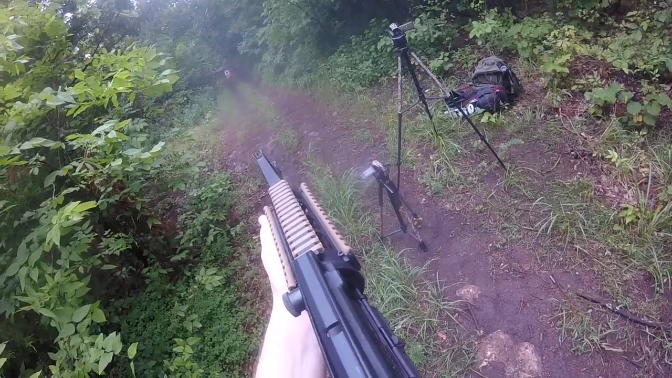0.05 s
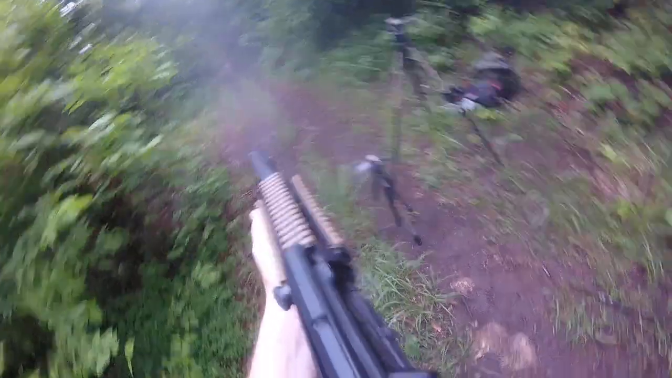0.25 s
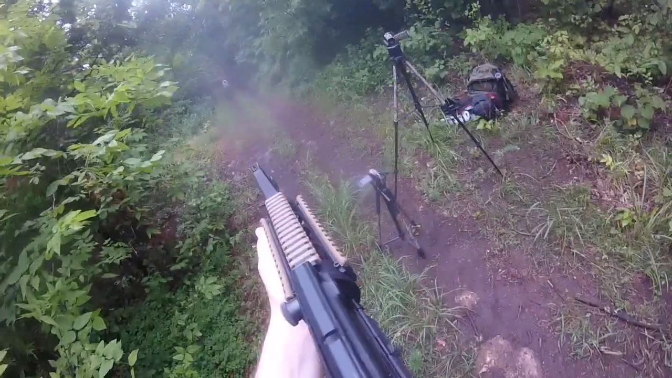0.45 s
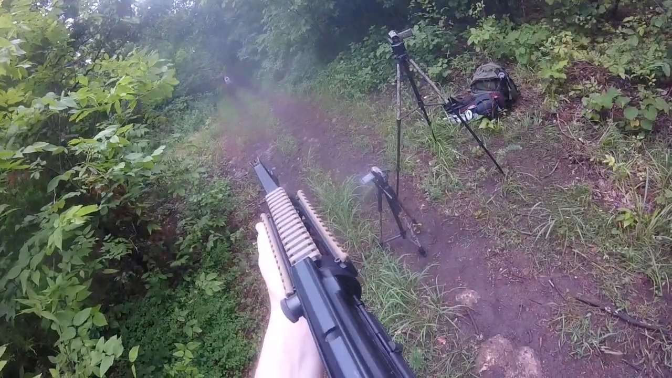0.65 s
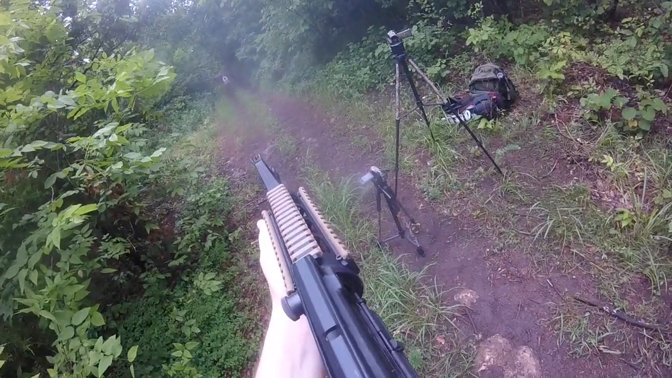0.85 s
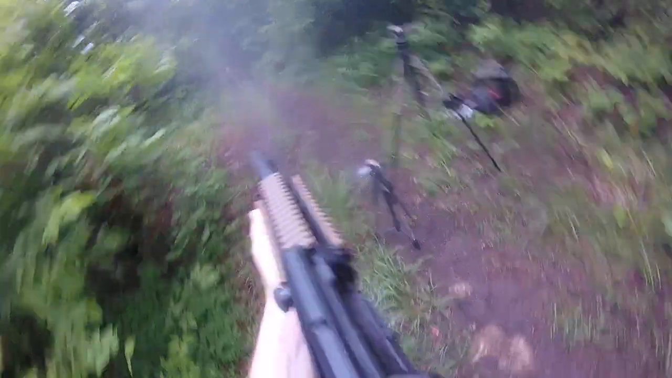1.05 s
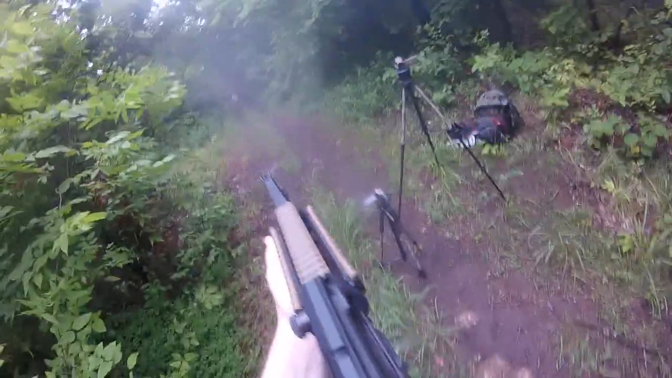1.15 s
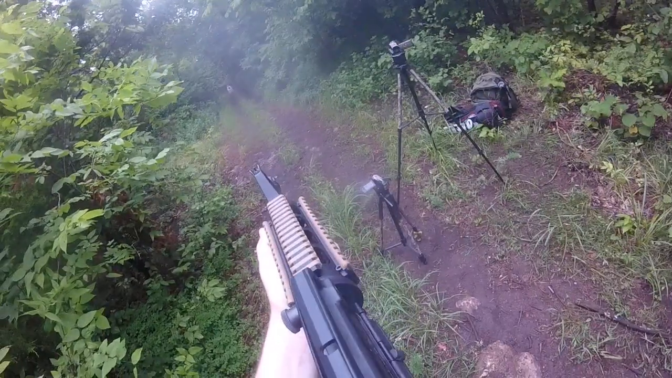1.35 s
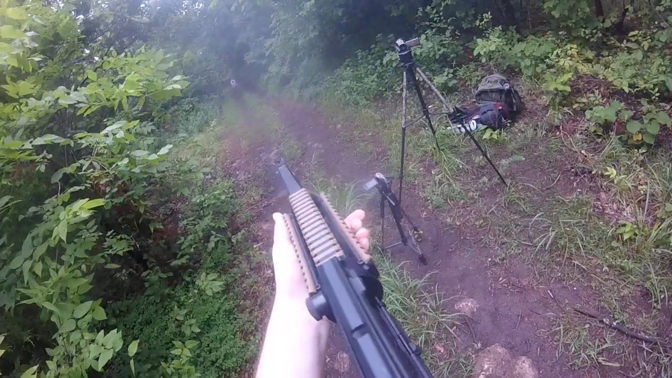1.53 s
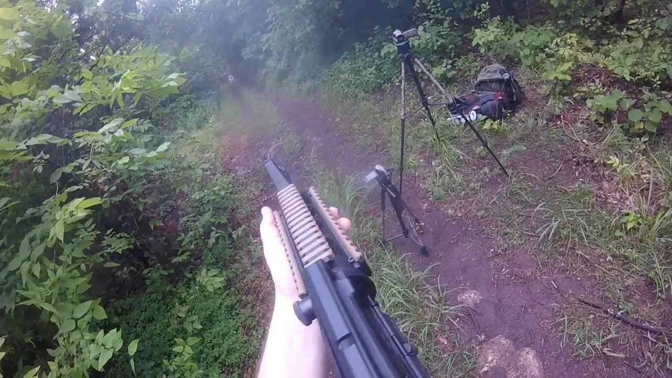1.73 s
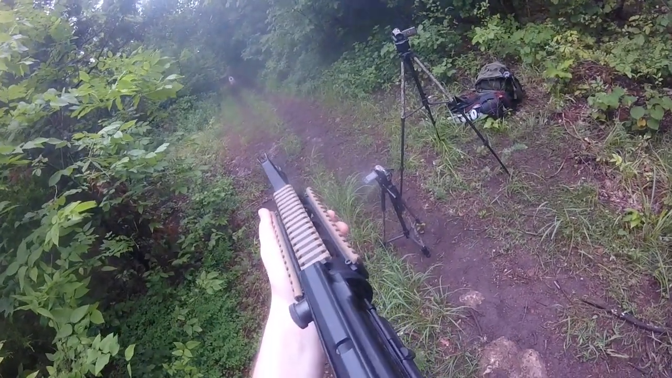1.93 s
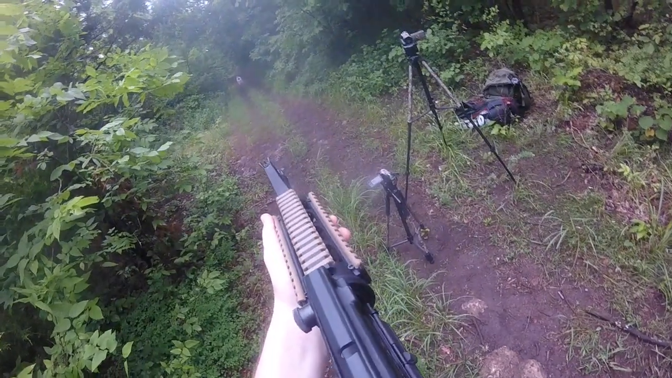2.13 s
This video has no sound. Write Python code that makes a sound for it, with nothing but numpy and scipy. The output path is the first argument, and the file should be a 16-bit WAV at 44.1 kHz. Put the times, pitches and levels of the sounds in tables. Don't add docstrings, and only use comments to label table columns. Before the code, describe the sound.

Two loud rifle shots fired close by outdoors, each with a rolling echo through the woods

```python
import sys
import numpy as np
from scipy import signal
from scipy.fft import rfft, irfft
from scipy.io import wavfile
from scipy.ndimage import uniform_filter1d

SR = 44100
rng = np.random.default_rng(int(sys.argv[2]) if len(sys.argv) > 2 else 0)


def waveform_to_disk(signal):
    frames = np.transpose(np.atleast_2d(signal))
    scaled = np.clip(frames, -1, 1) * 32767
    samples = np.round(scaled).astype(np.int16)
    wavfile.write(sys.argv[1], SR, samples)


def voltage_ratio(decibels):
    exponent = np.asarray(decibels, float) / 20
    return 10 ** exponent


N = 94815
LEAD = SR


def evened(x):
    return x / np.sqrt(np.mean(x ** 2) + 1e-20)


def read(points, hz):
    f, value = np.transpose(points)
    return np.interp(np.log(hz + 1), np.log(f + 1), value)


def colour(x, points):
    gain = voltage_ratio(read(points, np.fft.rfftfreq(len(x), 1 / SR)))
    return irfft(rfft(x) * gain, len(x))


def add(mix, s, sound):
    part = mix[round(s * SR):][:len(sound)]
    part += sound[:len(part)]


DUCK_DB, HOLD_S, BACK_S = -20, .08, .325


def duck_db(since):
    climb_left = np.clip((BACK_S - since) / (BACK_S - HOLD_S), 0, 1)
    return DUCK_DB * (since >= 0) * climb_left


# (frequency [Hz], level [dB per Hz])
AIR_SPECTRUM = [(15, -5), (25, -24.5), (100, -19), (160, -32), (250, -42), (1500, -36), (5000, -54.5),
                (12000, -69)]
# (time [s], level [dB])
GUSTS = [(0, -0.5), (.3, 1), (1.45, 3.5), (1.75, 0), (2.0, 0.5), (2.07, 8.5), (2.15, 8.5)]
AIR_DB, LUMP_DB = -48.5, 1.5


def air():
    t = np.arange(N) / SR
    lumps = uniform_filter1d(rng.standard_normal(N), size=3000)
    lumps = evened(uniform_filter1d(lumps, size=3000))
    noise = evened(colour(rng.standard_normal(N), AIR_SPECTRUM))
    rumble = signal.sosfiltfilt(signal.butter(2, 200, fs=SR, output="sos"), noise)
    gust_db = np.interp(t, *np.transpose(GUSTS)) + LUMP_DB * lumps
    return voltage_ratio(AIR_DB) * (noise + rumble * (voltage_ratio(gust_db) - 1))


# (time [s], length [s], start [Hz], end [Hz], level [dB])
BIRD_CALLS = [
    (1.932, .018, 3930, 3060, -67),
    (1.962, .022, 4070, 3060, -66),
]


def chirp(length, from_hz, to_hz, db):
    hz = np.linspace(from_hz, to_hz, round(length * SR))
    return voltage_ratio(db) * np.hanning(len(hz)) * np.sin(2 * np.pi * np.cumsum(hz) / SR)


# (time [s], level [dB])
TICKS = [
    (.001, -43),
    (1.851, -52),
    (1.92, -58),
    (2.07, -56),
]


def tick(db):
    t = np.arange(600) / SR
    return voltage_ratio(db - 60 * t / 0.014) * uniform_filter1d(rng.standard_normal(600), size=3)


# (frequency [Hz], decay by 60 dB [s])
WOODS_T60 = [(100, 0.6), (220, 0.92), (400, 1.7), (800, 1.5), (1500, 1.46), (3500, 0.83), (8000, 0.66),
             (13000, 0.51)]
TREES_PER_S, TREE_SPREAD_DB = 2500, 2
LEAF_SHARE, LEAF_HZ = .3, 1900
WOODS_DB = -12
BUSH_DB, BUSH_T60, BUSH_TILT_DB = -1, 0.26, 4.5
RIDGE_DB, RIDGE_HZ, RIDGE_T60 = -28.5, 1500, 5


def scatter(size):
    trees = rng.standard_normal(size)
    trees *= voltage_ratio(TREE_SPREAD_DB * np.minimum(rng.exponential(1, size), 4))
    trees *= rng.random(size) < TREES_PER_S / SR
    hz, t, low = signal.stft(evened(trees), SR, nperseg=256)
    high = signal.stft(rng.standard_normal(size), SR, nperseg=256)[2]
    hz = hz[:, None]
    leafy = np.clip(LEAF_SHARE + (hz / LEAF_HZ) ** 2, 0, 1)
    z = np.sqrt(1 - leafy) * low + np.sqrt(leafy) * high
    far = voltage_ratio(WOODS_DB - 60 * (t - BACK_S) / read(WOODS_T60, hz) - 8.5)
    bush = voltage_ratio(BUSH_DB - 60 * t / BUSH_T60 + BUSH_TILT_DB * np.log2(1 + hz / 700))
    ridge = voltage_ratio(RIDGE_DB - 60 * t / RIDGE_T60) / (1 + (hz / RIDGE_HZ) ** 4)
    strength = np.sqrt(far ** 2 + bush ** 2 + ridge ** 2)
    return signal.istft(z * strength, SR, nperseg=256)[1][:size]


ECHO_HZ, ECHO_TURNS, TURNS_PER_S = 740, .45, 4.5
GIRTH = .22


def echo(out, delay, db):
    t = np.arange(-220, 500) / SR
    hz = ECHO_HZ * np.exp(GIRTH * min(delay * 10, 1) * np.sin(1e4 * delay))
    turns = ECHO_TURNS + TURNS_PER_S * min(delay, .33) * np.where(t > 0, 1, .25)
    envelope = np.exp(-(t * ECHO_HZ / turns) ** 2)
    return delay - 220 / SR, voltage_ratio(db) * envelope * np.cos(2 * np.pi * hz * t + out)


SHADOW, SHADOW_S = .75, .003


def shadowed(x):
    mid = signal.sosfiltfilt(signal.butter(3, [250, 1600], "band", fs=SR, output="sos"), x)
    t = np.arange(len(x))[::8] / SR
    shade = np.ones(len(t))
    for delay, _ in NEAR_ECHOES + TRUNK_ECHOES:
        shade *= 1 - SHADOW * np.exp(-((t - delay) / SHADOW_S + .2) ** 2)
    return x + mid * (np.repeat(shade, 8)[:len(x)] - 1)


# (delay [s], level as heard [dB])
NEAR_ECHOES = [(.0057, -3), (.0093, -4), (.0108, -10), (.0163, -12), (.0173, -12), (.0183, -13),
               (.0223, -14), (.0238, -10)]
# (delay [s], level as heard [dB])
TRUNK_ECHOES = [(0.0058, -8), (0.0317, -13), (0.0474, -12), (0.0967, -18), (0.117, -18), (0.1376, -22),
                (0.1591, -20), (0.1811, -17), (0.2402, -16), (0.246, -17), (0.2683, -16), (0.2809, -15),
                (0.2875, -16), (0.3207, -14), (0.3359, -13), (0.3518, -14), (0.4628, -18), (0.4719, -19),
                (0.4989, -20), (0.505, -21), (0.5149, -20), (0.6177, -23), (0.6618, -25), (0.7182, -27),
                (0.753, -29), (0.7584, -25), (0.8532, -28), (0.9619, -28), (0.9739, -31), (0.9816, -32)]
# (frequency [Hz], level [dB per Hz])
WOODS_SPECTRUM = [(50, -24), (135, -14.5), (260, -15.5), (620, -1), (1400, -12), (1720, -22.5), (9000, -40),
                  (15500, -56)]
TRUNK_DB = 2
CHANGE = .4
HOUSING_HZ, HOUSING_WIDTH_HZ, HOUSING_DB = 3400, 570, 4.5


def woods(same):
    tail = same + CHANGE * scatter(len(same))
    hz = np.fft.rfftfreq(len(tail), 1 / SR)
    housing_db = HOUSING_DB * np.exp(-((hz - HOUSING_HZ) / HOUSING_WIDTH_HZ) ** 2)
    shape = voltage_ratio(read(WOODS_SPECTRUM, hz) + housing_db)
    tail = irfft(rfft(tail) * evened(shape), len(tail))
    tail *= np.clip(np.arange(len(tail)) / SR / 0.0029, 0, 1)
    tail = shadowed(tail)
    for delay, db in NEAR_ECHOES:
        add(tail, *echo(-.6, delay, db - duck_db(delay)))
    for delay, db in TRUNK_ECHOES[1:]:
        add(tail, *echo(.6, delay, db + TRUNK_DB - duck_db(delay)))
    return tail


def jolt(db):
    t = np.arange(8192) / SR
    swing_hz, t60 = 32, .07
    return -voltage_ratio(db - 60 * t / t60) * np.sin(2 * np.pi * swing_hz * t)


# (frequency [Hz], level [dB], decay by 60 dB [s])
HAMMER_MODES = [(850, -9.5, .02), (2465, -0.5, 0.02), (3970, -20, 0.0087), (5100, -2.5, .006)]
HAMMER_LEAD_S = 0.0074


def hammer(db):
    t = np.arange(round(HAMMER_LEAD_S * SR)) / SR
    ring = sum(voltage_ratio(d - 60 * t / t60) * np.sin(2 * np.pi * hz * t) for hz, d, t60 in HAMMER_MODES)
    rattle = 3.3 * uniform_filter1d(rng.standard_normal(len(t)), size=3) * voltage_ratio(-60 * t / 0.0088)
    return voltage_ratio(db) * (ring + rattle) * np.minimum(t / .0006, 1)


PUSH_DB, PUSH_S, PUSH_AT_S = 8, .00045, .0007
GROUND_DB, GROUND_S = -6, .0062


def push(t, db):
    u = np.maximum(t, 0) / PUSH_S
    return -voltage_ratio(db - DUCK_DB) * u * (2 - u) * np.exp(-u)


# (frequency [Hz], level [dB per Hz])
JET_SPECTRUM = [(40, -6), (300, -4.5), (800, -5), (1450, 2), (2400, -10), (3500, -4.5), (5000, -12.5),
                (15500, -18.5)]
JET_DB, JET_HOLD_S, JET_T60 = 14.5, .0055, 0.012
THUMP_DB, THUMP_HZ, THUMP_T60 = -4, 143, .035


def blast(jet_db):
    t = np.arange(4096) / SR
    direct = push(t - PUSH_AT_S, PUSH_DB)
    bounce = push((t - GROUND_S) / 1.13, PUSH_DB + GROUND_DB)
    jet = evened(colour(rng.standard_normal(len(t)), JET_SPECTRUM))
    jet *= np.minimum((t / .0009) ** 2, 1)
    jet *= voltage_ratio(JET_DB + jet_db - 60 * np.maximum(t - JET_HOLD_S, 0) / JET_T60)
    thump = voltage_ratio(THUMP_DB - 60 * t / THUMP_T60) * np.sin(2 * np.pi * THUMP_HZ * t)
    return direct + bounce + jet - thump


# (time [s], blast [dB], hammer [dB], recoil [dB], gas jet [dB])
RIFLE_SHOTS = [
    (-0.62, -3, -20, -6, 0),
    (.2283, -2, -16, 6, 1),
    (1.0300, -2, -29, -11.5, -2),
]


def scene():
    mix, same = np.zeros(N + LEAD), scatter(3 * SR)
    for s, db, hammer_db, jolt_db, jet_db in RIFLE_SHOTS:
        at = s + LEAD / SR
        add(mix, at - HAMMER_LEAD_S, hammer(hammer_db))
        add(mix, at, voltage_ratio(db) * blast(jet_db))
        add(mix, at, jolt(jolt_db))
        add(mix, at, voltage_ratio(db) * woods(same))
    mix = mix[LEAD:] + air()
    for s, db in TICKS:
        add(mix, s, tick(db))
    for s, *call in BIRD_CALLS:
        add(mix, s, chirp(*call))
    return mix[None]


# (frequency [Hz], level [dB per bin])
FAINT_TREBLE = [(8500, -128), (10500, -110), (12000, -110), (13500, -89.5), (15000, -80), (16200, -59)]
# (time [s], level [dB])
STRICTNESS = [(.98, 1), (1.12, 8), (1.55, 10), (1.8, -2)]
LUCK_DB, EDGE_HZ = 6, 16500


def thinned(x):
    hz, t, z = signal.stft(x, SR, nperseg=1024)
    band_hz = hz[4:512:8, None]
    power = (abs(z[:512]) ** 2).reshape(64, 8, -1).mean(1)
    level_db = 10 * np.log10(power + 1e-20)
    luck = rng.standard_normal((len(t), 64)).T
    luck_db = LUCK_DB * np.repeat(luck, 3, axis=1)[:, :len(t)]
    edge_db = read(FAINT_TREBLE, band_hz) + np.interp(t, *np.transpose(STRICTNESS))
    keep = np.clip((level_db - edge_db + luck_db) / 2, 0, 1) + (band_hz < FAINT_TREBLE[0][0])
    keep = np.repeat(np.minimum(keep, 1), 8, axis=0) * (hz[:512, None] < EDGE_HZ)
    return signal.istft(z * np.vstack([keep, keep[-1:]]), SR, nperseg=1024)[1][:N]


def top_cut(x):
    return signal.sosfilt(signal.butter(12, 16500, fs=SR, output="sos"), x)


def record(dry):
    t = np.arange(N) / SR
    ceiling = .72
    gain_db = np.min([duck_db(t - row[0]) for row in RIFLE_SHOTS], axis=0)
    saturated = ceiling * np.tanh(dry[0] * voltage_ratio(gain_db) / ceiling)
    return top_cut(thinned(saturated)[None])


dry = scene()
out = record(dry)
waveform_to_disk(out)
```